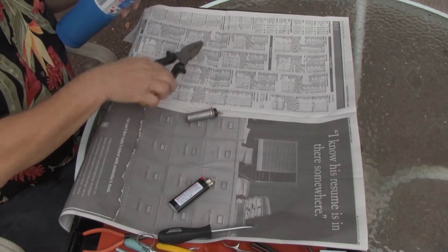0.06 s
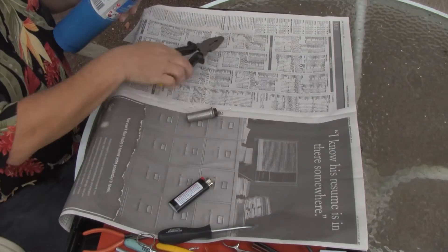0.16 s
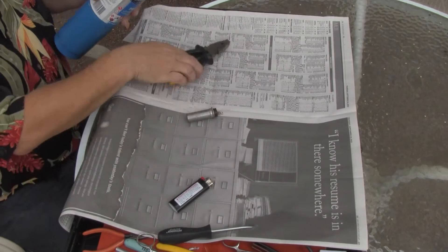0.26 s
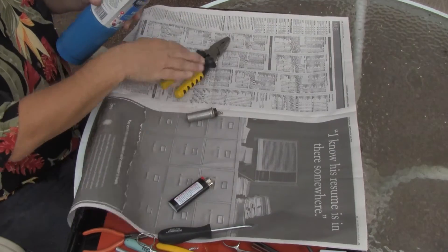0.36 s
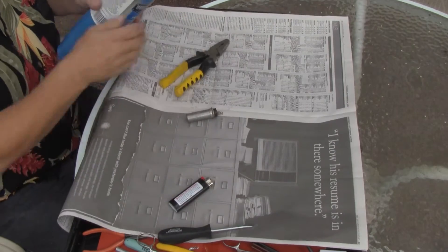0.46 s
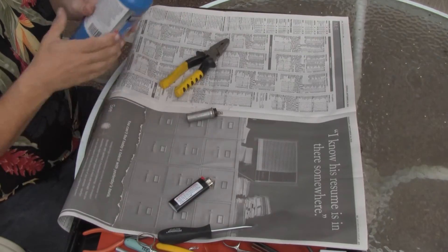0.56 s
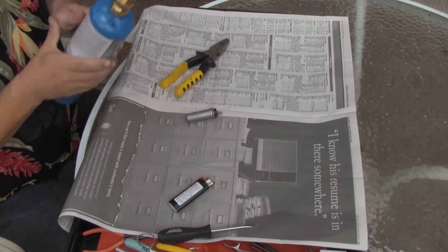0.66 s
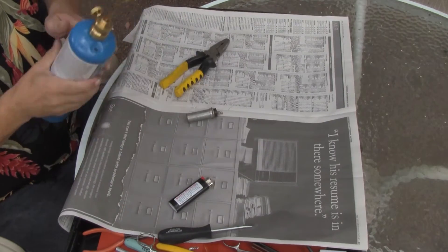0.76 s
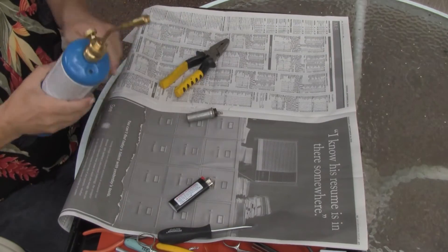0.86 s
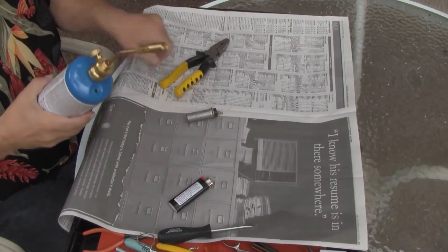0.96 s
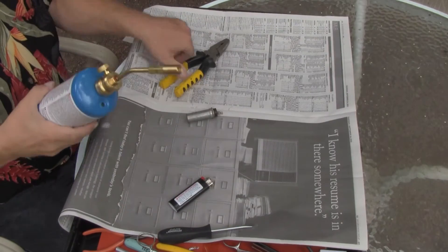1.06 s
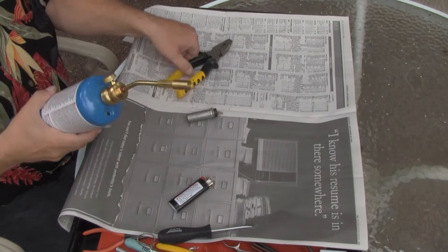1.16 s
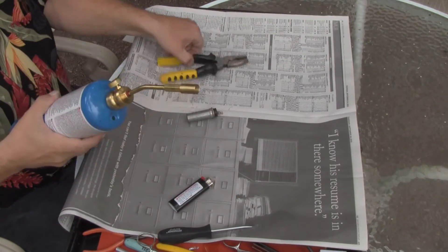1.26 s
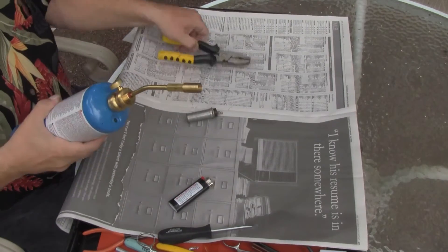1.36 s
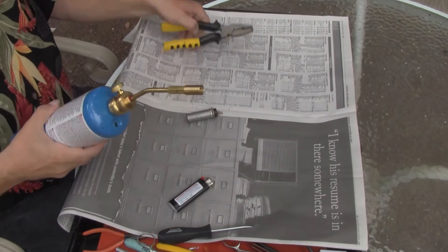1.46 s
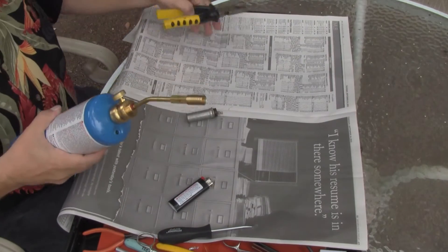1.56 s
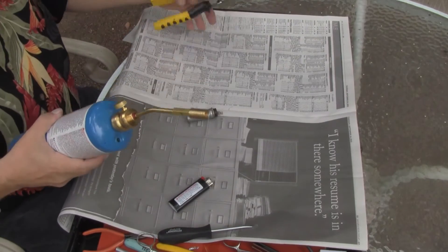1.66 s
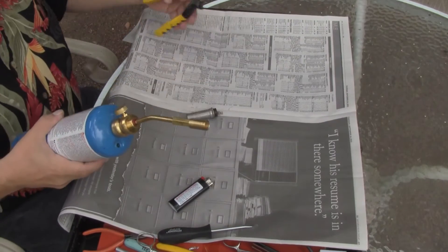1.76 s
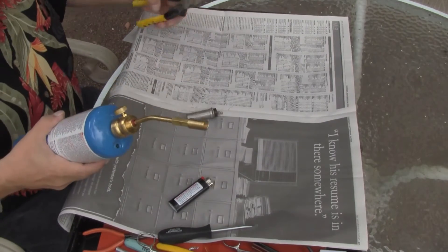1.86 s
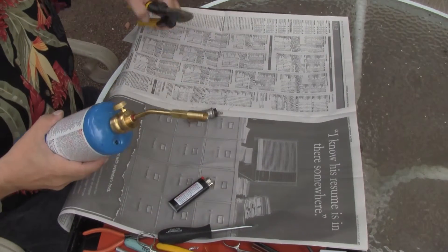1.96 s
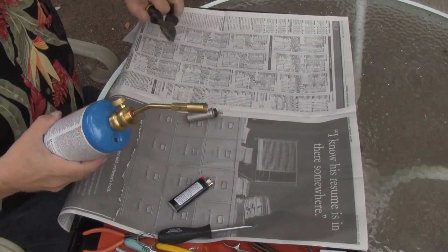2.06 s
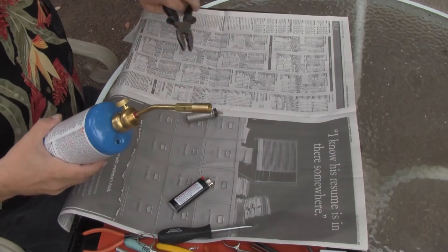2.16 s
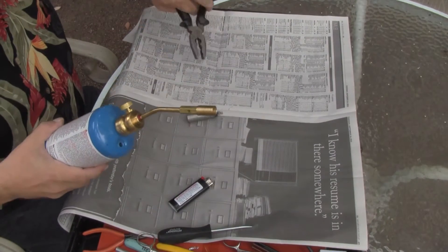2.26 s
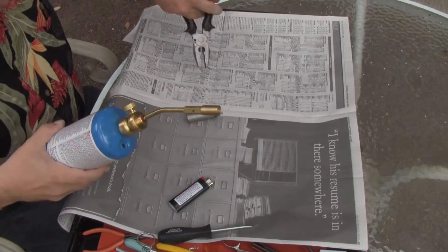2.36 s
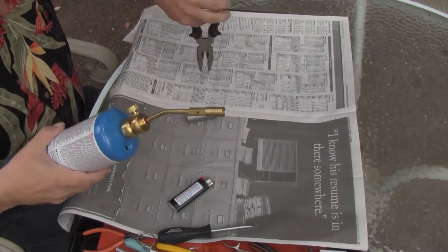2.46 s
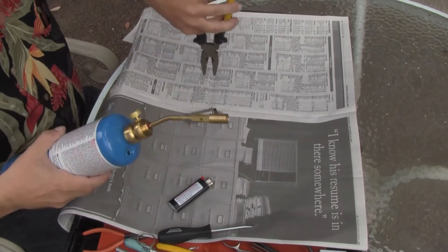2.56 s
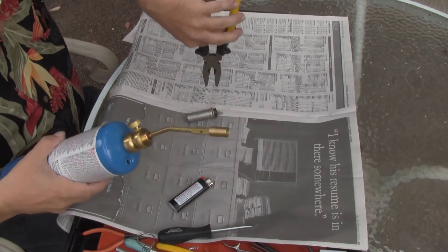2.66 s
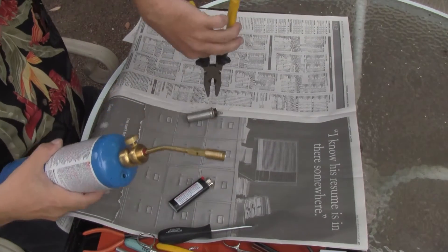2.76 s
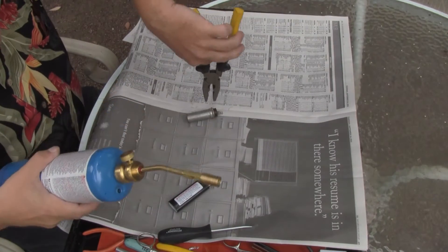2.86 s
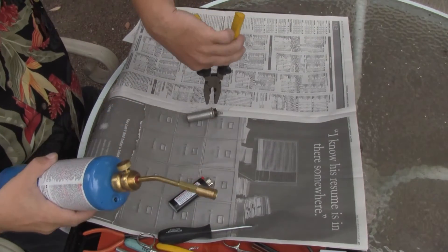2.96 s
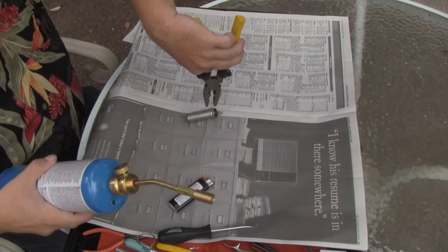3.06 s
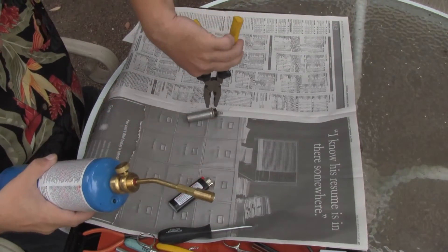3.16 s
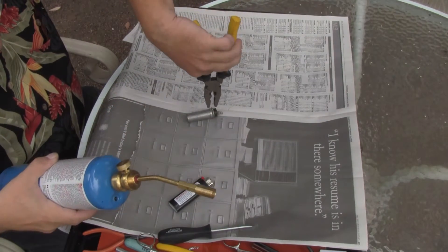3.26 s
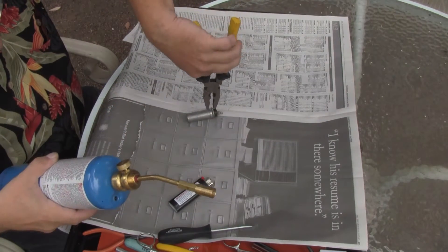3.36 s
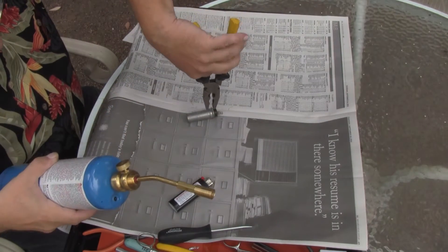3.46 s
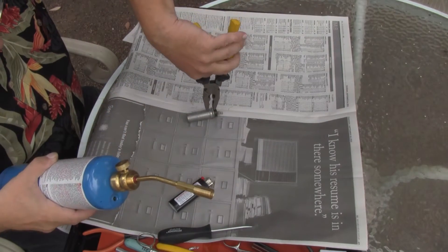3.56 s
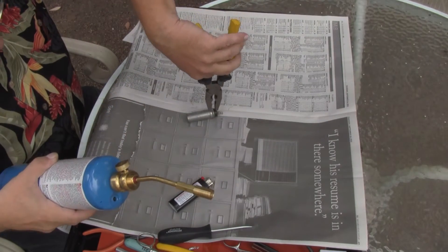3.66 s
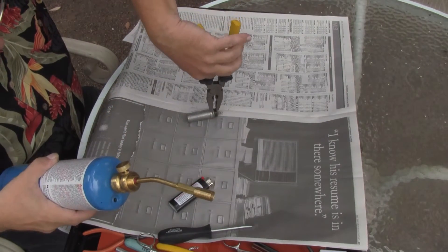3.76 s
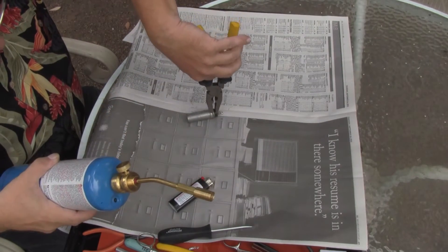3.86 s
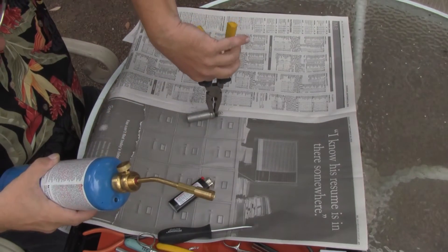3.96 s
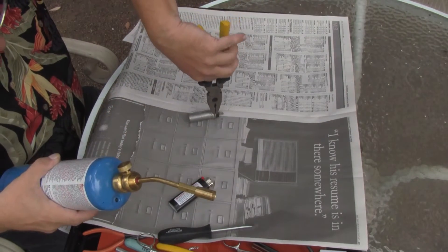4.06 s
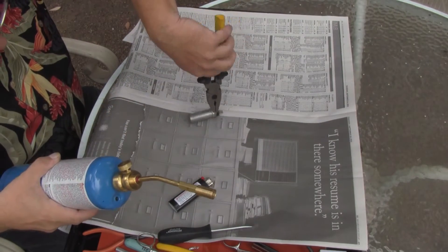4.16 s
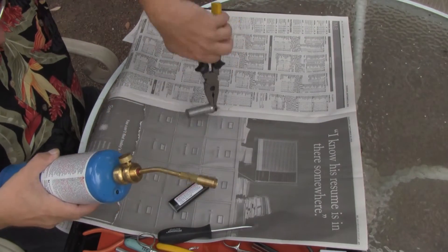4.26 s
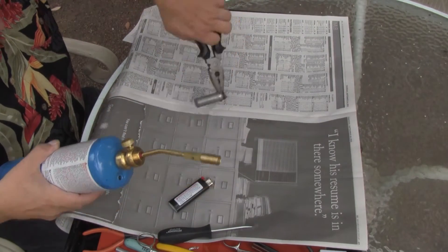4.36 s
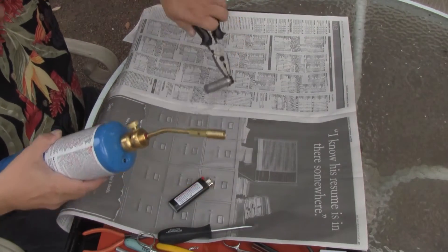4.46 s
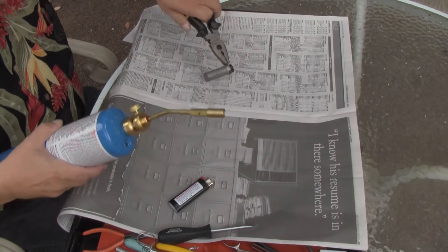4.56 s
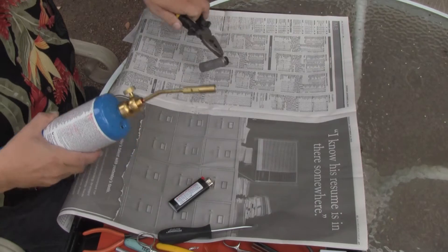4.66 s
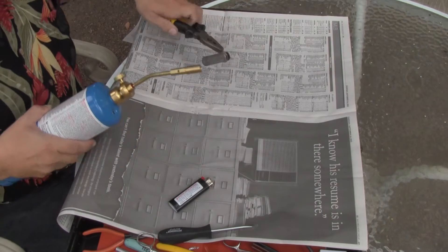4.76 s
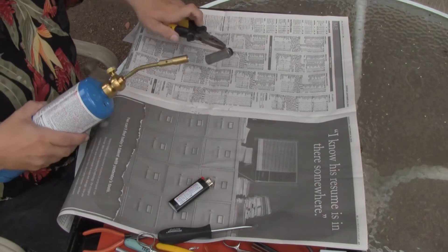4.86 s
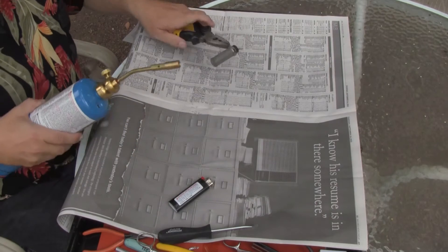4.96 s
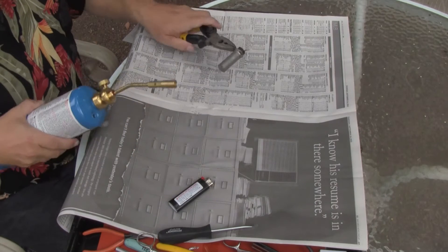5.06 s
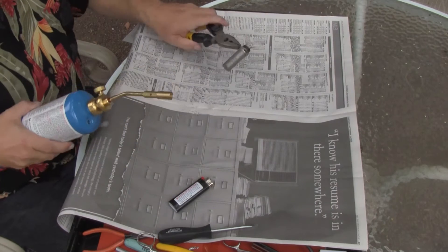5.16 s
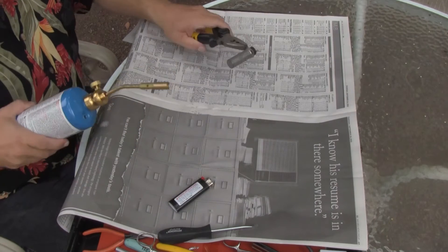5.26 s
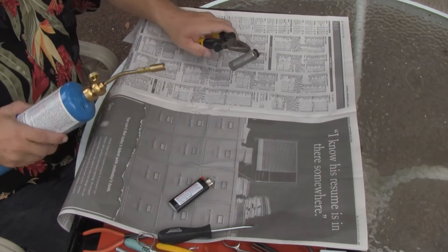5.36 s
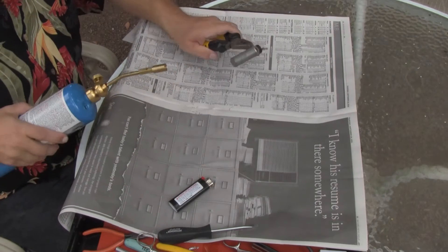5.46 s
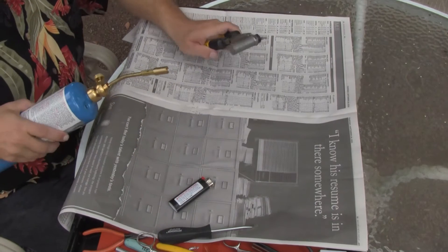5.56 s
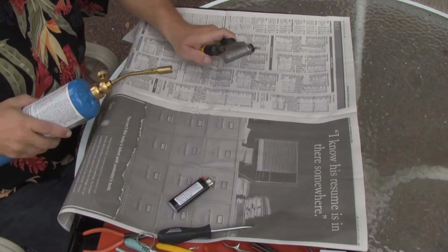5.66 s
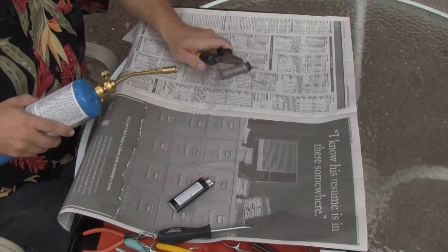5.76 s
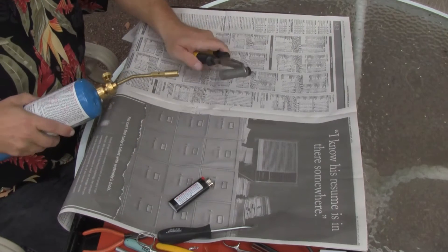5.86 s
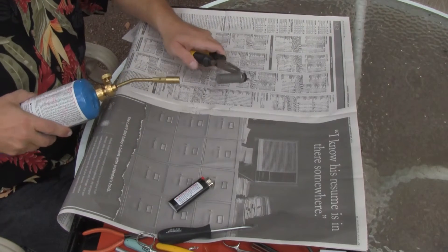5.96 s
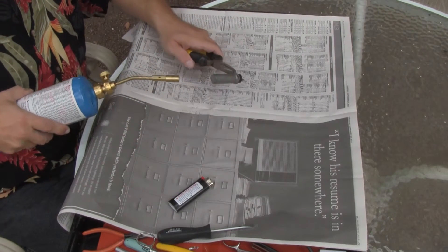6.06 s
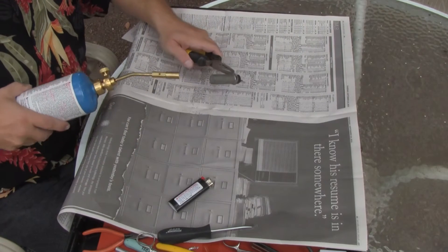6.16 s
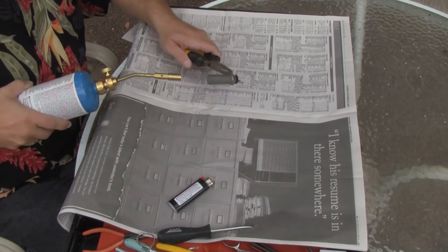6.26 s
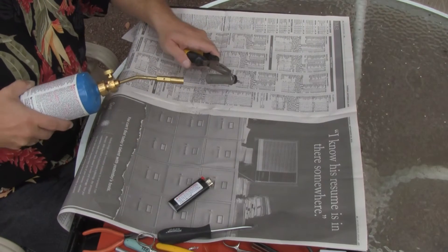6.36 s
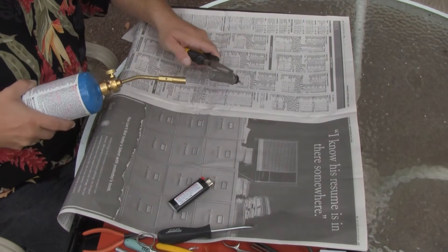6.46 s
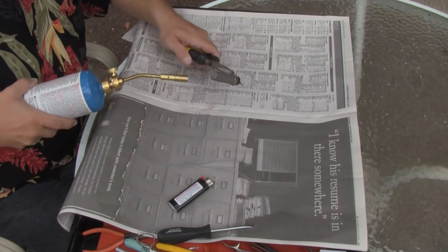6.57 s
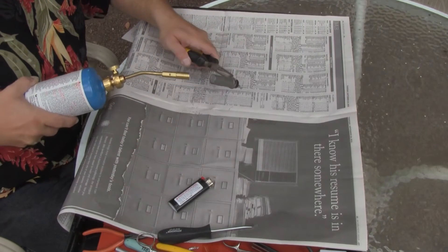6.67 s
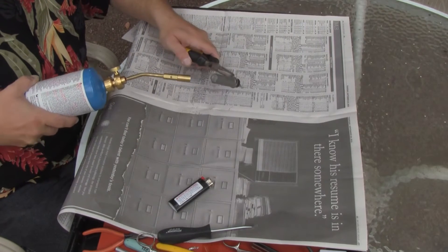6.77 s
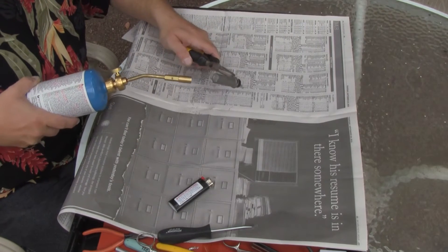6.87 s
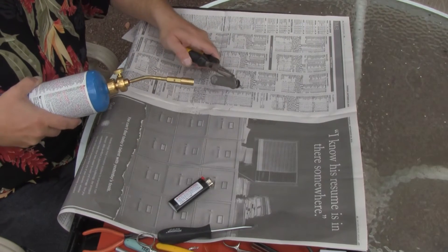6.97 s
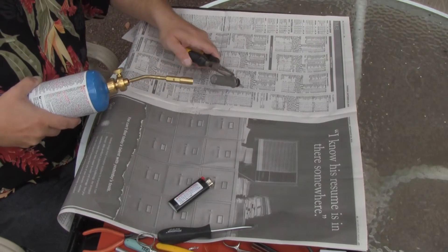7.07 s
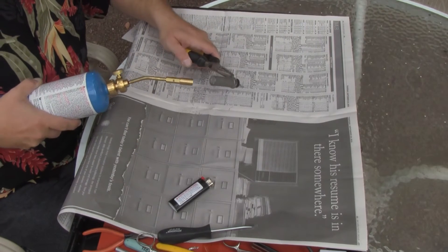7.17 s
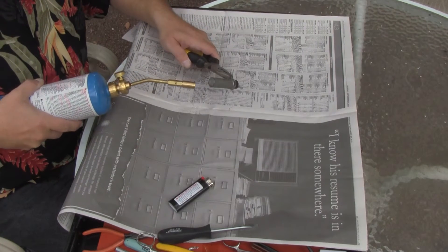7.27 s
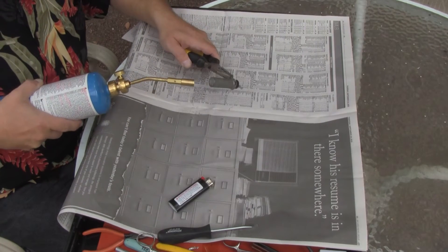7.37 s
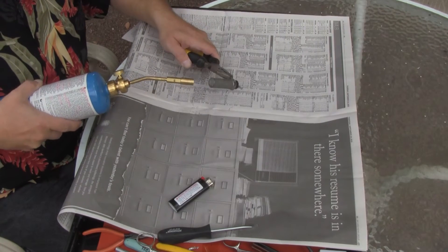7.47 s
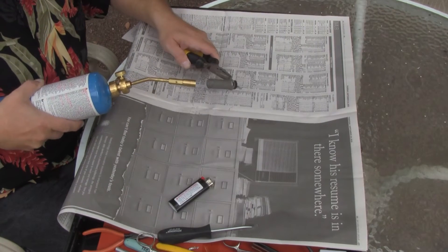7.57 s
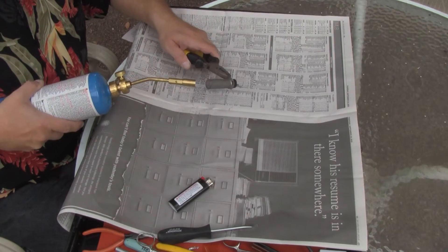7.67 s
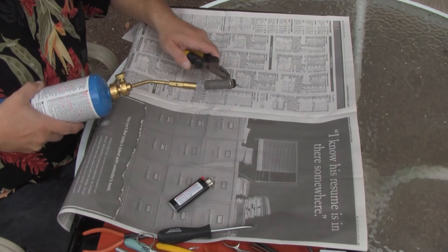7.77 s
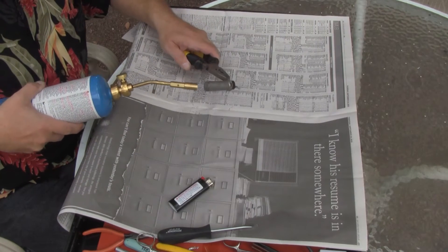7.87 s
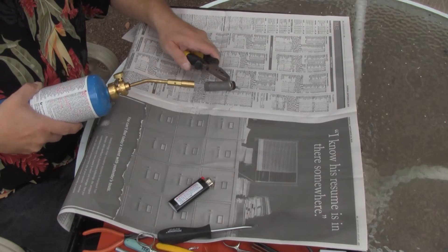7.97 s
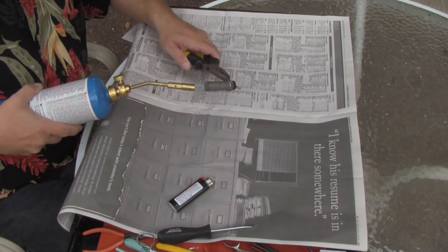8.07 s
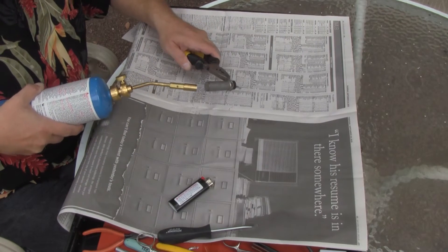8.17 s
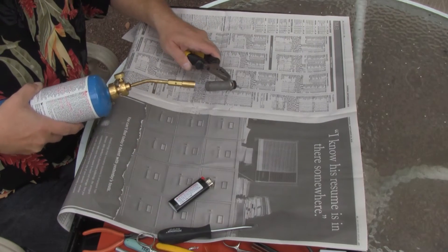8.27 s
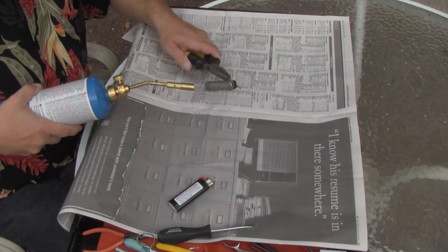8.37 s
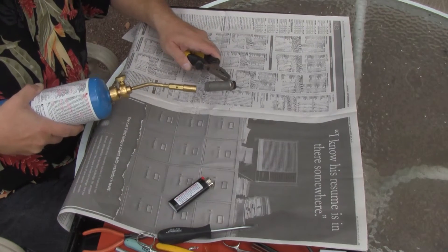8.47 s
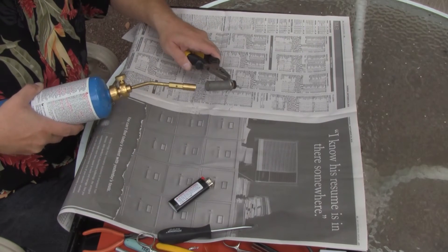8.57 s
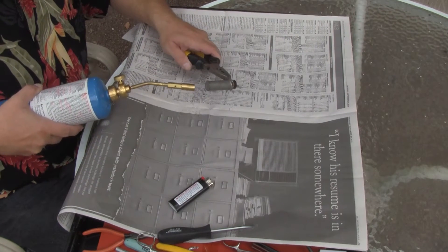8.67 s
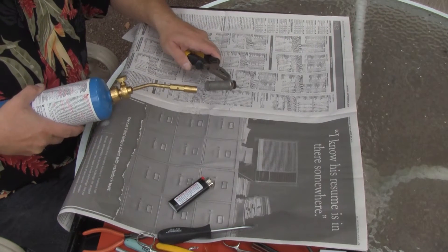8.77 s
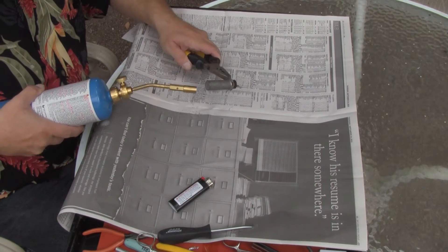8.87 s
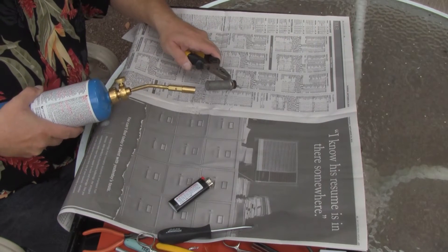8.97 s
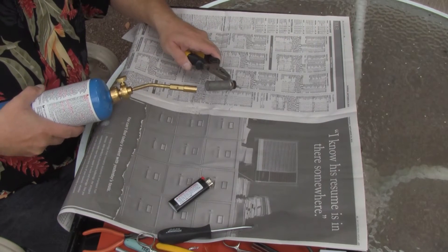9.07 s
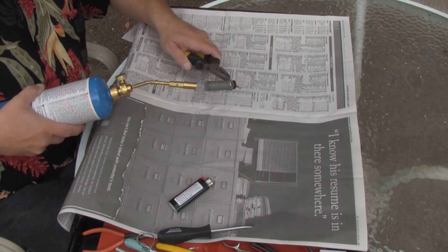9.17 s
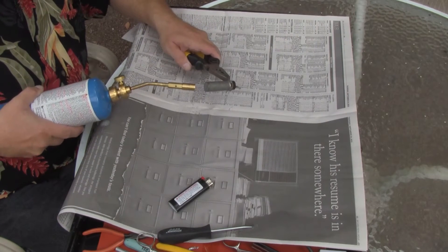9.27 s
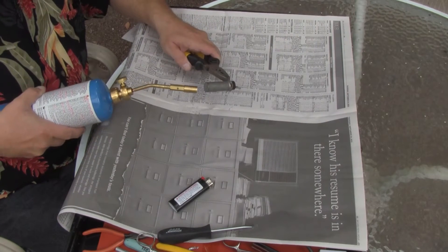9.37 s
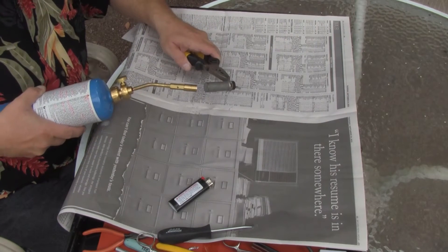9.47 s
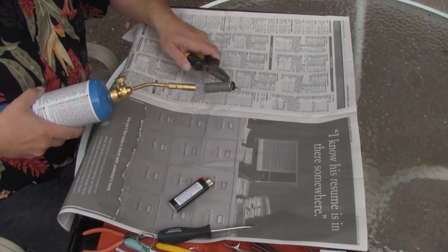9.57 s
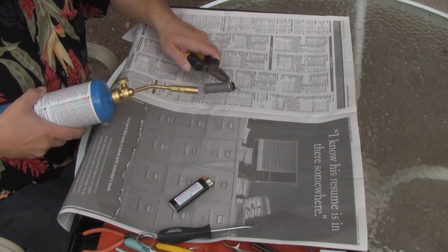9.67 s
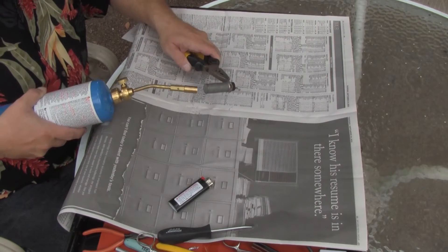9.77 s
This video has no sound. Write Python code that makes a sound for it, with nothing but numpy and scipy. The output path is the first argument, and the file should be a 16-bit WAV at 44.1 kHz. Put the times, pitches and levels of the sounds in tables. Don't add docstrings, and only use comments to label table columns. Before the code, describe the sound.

A gas torch burns continuously close to two small microphones, a rough midrange roar with bright hiss and a thin airy whistle. Pliers drop on a glass table almost at once, rattling briefly, then are lifted with a soft knock. The torch's colour sweeps as the hand moves. Midway it comes lower, a small metal click follows, and near the end the flame flares in short puffs against metal.

```python
import sys
import numpy as np
from scipy import signal
from scipy.fft import rfft, irfft, next_fast_len
from scipy.io import wavfile
from scipy.ndimage import uniform_filter1d, map_coordinates

SR = 44100
rng = np.random.default_rng(int(sys.argv[2]) if len(sys.argv) > 2 else 0)


def elevation(decibels):
    levels = np.asarray(decibels, float)
    return 10 ** (levels / 20)


def waveform_to_disk(signal):
    frames = np.transpose(np.atleast_2d(signal))
    scaled = np.clip(frames, -1, 1) * 32767
    samples = np.round(scaled).astype(np.int16)
    wavfile.write(sys.argv[1], SR, samples)


N = 432621

# (time [s], table [ms], forearm [ms], body [ms], gas tank [ms])
HAND_PATH = [(0, 1.049, 1.405, 2.877, .584), (.49, 1.277, 1.646, 2.854, .578),
             (.77, 1.475, 1.836, 2.884, .554), (.93, 1.472, 1.91, 2.89, .54),
             (1.25, 1.345, 1.947, 2.87, .485), (1.81, 1.365, 1.94, 2.983, .467),
             (2.12, 1.458, 1.98, 3.064, .477), (2.65, 1.286, 1.864, 2.829, .491),
             (2.96, 1.225, 1.795, 2.7, .597), (4.18, 1.161, 1.71, 2.573, .595),
             (4.52, 1.222, 1.737, 2.518, .5), (4.83, .89, 1.755, 2.365, .39), (5.15, .74, 1.8, 2.253, .453),
             (5.64, .7, 1.668, 2.17, .545), (5.93, .468, 1.58, 2.31, .68), (6.76, .455, 1.557, 2.269, .655),
             (7.17, .4, 1.53, 2.222, .624), (9.81, .39, 1.5, 2.26, .608)]


def curve(table, hz):
    at, value = np.transpose(table)
    return np.interp(np.log(hz + 1), np.log(at), value)


def shaped(x, gain_at):
    size = next_fast_len(N)
    return irfft(rfft(x, size) * gain_at(np.fft.rfftfreq(size, 1 / SR)), size)[:N]


def coloured(x, table):
    y = shaped(x, lambda hz: elevation(curve(table, hz)))
    return y / np.std(y)


def walk(rate):
    k = max(int(SR / rate), 2)
    levels = np.repeat(rng.standard_normal(N // 20), k)[:N]
    y = uniform_filter1d(uniform_filter1d(levels, k), k)
    return y / np.std(y)


def columns(table):
    s, *values = np.transpose(table)
    return [np.interp(np.arange(N) / SR, s, v) for v in values]


def late(x, lag_ms):
    return map_coordinates(x, [np.arange(N) - lag_ms * SR / 1000], order=3)


def held(high_low):
    high_ms, low_ms = 1.2, 0.45
    table_ms = columns(HAND_PATH)[0]
    low = np.clip((high_ms - table_ms) / (high_ms - low_ms), 0, 1)
    return high_low[0] + (high_low[1] - high_low[0]) * low


def roar(flutter, bursts):
    # (frequency [Hz], level [dB])
    flame_tone = [(120, -23.5), (300, 0.5), (500, 1), (700, -0.5), (850, 0.5), (1000, 3), (1250, 0),
                  (1600, -3.5), (2100, -3.5), (2600, -6.5), (3200, -9.5), (3700, -16.5), (4500, -25),
                  (8000, -42)]
    # (frequency [Hz], level [dB])
    rumble_tone = [(25, -9), (60, -19.5), (120, -5.5), (200, 4), (300, -2), (500, 4.5), (900, -31)]
    rumble_db = held((-14, -13.5))
    eddies = rng.standard_normal(N) * elevation(0.15 * flutter + 0.68 * bursts)
    rumble = coloured(rng.standard_normal(N), rumble_tone)
    return coloured(eddies, flame_tone) + elevation(rumble_db) * rumble


def burning_hiss(flutter, bursts):
    # (frequency [Hz], level [dB])
    hiss_tone = [(2500, -35), (3900, -4), (4400, 1.5), (5000, -3.5), (5500, 1), (6000, 2), (6600, -4),
                 (7500, -4.5), (8500, -5), (10000, -23)]
    swing_db = 1.1 * flutter + 0.43 * bursts + 0.93 * walk(400)
    return coloured(rng.standard_normal(N) * elevation(swing_db), hiss_tone)


def jet_air(bursts):
    # (frequency [Hz], level [dB])
    air_tone = [(6000, -12), (7500, 6.5), (8200, 4), (9000, 3), (12000, -0.5), (14000, -11), (15800, -6)]
    swing_db = 0.32 * walk(9) + 0.63 * bursts + 2.2 * walk(300)
    return coloured(rng.standard_normal(N) * elevation(swing_db), air_tone)


def jet_whistle(echo_change_db):
    # (frequency [Hz], width [Hz], level [dB])
    whistle_peaks = [(11000, 460, 0), (11700, 900, -6), (12600, 1300, -8), (10100, 1000, -9)]

    def whistled(x, peaks):
        def gain(hz):
            power = sum(elevation(2 * db) / (1 + (2 * (hz - at) / width) ** 2) for at, width, db in peaks)
            return np.sqrt(power)
        return shaped(x, gain)

    shear = rng.standard_normal((2, N)) * elevation(0.8 * walk(6) + 0.59 * walk(200))
    core = whistled(shear[0], whistle_peaks[:1])
    skirt = whistled(shear[1], whistle_peaks[1:])
    whistle = core + elevation(-2 - 0.33 * echo_change_db) * skirt
    return whistle / np.std(whistle)


def nozzle_jet(bursts, hiss_db, whistle_db, shake_ms):
    # (time [s], delay [ms], level [dB])
    jet_bounce = [(0, 1.04, -7), (.8, 1.47, -14), (1.25, 1.31, -17), (2.1, 1.44, -15), (2.53, 1.33, -13),
                  (3.07, 1.172, -20), (3.9, 1.14, -25), (4.5, 1.207, -15), (4.85, .9, -15),
                  (5.15, .734, -9), (5.32, .713, -10), (5.55, .64, -12), (5.72, .615, -13),
                  (5.95, .452, -8), (6.2, .48, -8), (6.45, .436, -10), (7.2, .395, -16), (9.81, .333, -18)]
    lag_ms, echo_db = columns(jet_bounce)
    echo_change_db = echo_db - np.mean(echo_db)
    jet = elevation(hiss_db - 4.0) * jet_air(bursts) + elevation(whistle_db + 1.0) * jet_whistle(echo_change_db)
    tank_db = held((-13, -11)) + np.minimum(echo_change_db, 0)
    tank = elevation(tank_db) * late(jet, columns(HAND_PATH)[3] - shake_ms)
    echo = elevation(echo_db + 2.2)
    table = echo * late(jet, lag_ms + shake_ms)
    return (jet + table + tank) / np.sqrt(1 + echo ** 2)


def echoed(x, shake_ms):
    table_ms, arm_ms, body_ms, tank_ms = np.array(columns(HAND_PATH)) + shake_ms
    table_low, table_high = elevation(held((-5.5, -3.2))), elevation(held((-27, -25)))
    arm, body, tank = elevation(held((-22, -9.5))), elevation(held((-17, -19))), elevation(held((-14, -12)))
    rim_ms, rim = 2.24, elevation(held((-16, -34)))
    lows = shaped(x, lambda hz: 1 / (1 + (hz / 4800) ** 3))
    highs = x - lows
    rim_lows = shaped(lows, lambda hz: 1 - 1 / (1 + (hz / 900) ** 2))
    y = x + late((0.22 + 0.72 * table_low) * lows + 1.8 * table_high * highs, table_ms)
    y = y + rim * late(rim_lows, rim_ms + shake_ms)
    y = y + elevation(-0.1) * arm * late(lows, arm_ms)
    y = y + body * late(lows, body_ms)
    return y + tank * late(highs, tank_ms)


def torch():
    # (time [s], flame level [dB], aim of the nozzle, 0 = at the microphones [dB])
    burn = [(0, -29, -6.5), (.6, -28.5, -9), (1.0, -26, -12.5), (1.3, -24.5, -4), (2.3, -24.5, -4),
            (2.85, -24.5, -2.5), (3.5, -24.5, -0.5), (4.3, -24, -2.5), (4.68, -27, -12), (5.1, -27, -1.5),
            (5.65, -28, -8.5), (5.93, -27.5, -2.5), (6.45, -27, -4), (6.85, -26.5, -11), (7.5, -26.5, -6.5),
            (7.9, -25, -5), (8.9, -25, -7), (9.81, -25, -4.5)]
    # (time [s], gain [dB])
    flares = [
        (1.59, -1),
        (7.84, 2),
        (8.16, 1),
        (8.93, 0.5),
        (9.23, 0),
        (9.38, 3.5),
        (9.69, 2.5),
        (9.81, 2),
    ]
    flare_s = 0.047
    t = np.arange(N) / SR
    flame_db, aim_db = columns(burn)
    flame_db = flame_db + sum(db * np.exp(-((t - s) / flare_s) ** 2) for s, db in flares)
    whistle_db = -33 + aim_db - flame_db
    hiss_db = -39.5 + 0.2 * aim_db + 0.37 * (flame_db - np.mean(flame_db)) - flame_db
    shake_ms = 0.012 * walk(5)
    flutter, bursts = walk(14), walk(160)
    flame = roar(flutter, bursts) + elevation(hiss_db - 0.44) * burning_hiss(flutter, bursts)
    jet = nozzle_jet(bursts, hiss_db, whistle_db, shake_ms)
    return elevation(flame_db) * (elevation(-1.0) * echoed(flame, shake_ms) + jet)


def ring(x, modes):
    out = 0
    for hz, db, t60 in modes:
        pole = np.exp(2j * np.pi * hz / SR - np.log(1000) / (t60 * SR))
        out = out + elevation(db) * signal.lfilter([1], [1, -pole], x).imag
    return out


def pliers():
    # (time [s], rap on the glass [dB], thud of the whole top [dB], metal tick [dB])
    blows = [(0.3346, 1.2, -10.5, -21), (.345, -30, -8.5, -8), (0.364, -22, -24, -11), (.382, -7, -23, -25),
             (0.3885, -1.5, -10, -14), (.399, -10, -22, -16), (0.4063, -2.5, -13, -18),
             (0.434, -9, -10, -30), (1.336, -15, -9, -17), (5.6236, -16, -41.5, -14.5),
             (2.914, -24, -30, -29)]
    # (time [s], level [dB])
    rattle = [(0.334, -63), (0.334, -21), (.36, -16.5), (.378, -18), (.39, -15), (.41, -18), (.44, -25),
              (.47, -38), (.52, -54)]
    # (frequency [Hz], level [dB])
    scrape_tone = [(200, 0), (500, 7), (1000, 12), (2000, 6), (3500, -1.5), (6000, -20.5), (8000, -9.5),
                   (12000, -14), (16000, -34)]
    # (frequency [Hz], level [dB], time to fall 60 dB [s])
    glass_modes = [(416, -8, 0.11), (556, -27, .12), (760, -7, 0.11), (870, -4.5, 0.12), (980, -6, 0.1),
                   (1056, -3, 0.099), (1290, -4, 0.085), (1450, -7, 0.058), (1610, -19, .08),
                   (1970, -10, 0.057)]
    # (frequency [Hz], level [dB], time to fall 60 dB [s])
    top_modes = [(105, -14, .4), (133, -6, .6), (183, 0, .55), (215, -1, .05), (291, -4, .22),
                 (395, -5, .2)]
    # (frequency [Hz], level [dB], time to fall 60 dB [s])
    steel_modes = [(2400, -1, .012), (2900, -4, .025), (3600, -6, .01), (4300, -6, .012), (5500, -3, .01),
                   (6500, -7, .01), (7700, -12, .03), (9300, -7, .008), (11500, -14, .008)]
    rap, thud, tick = np.zeros((3, N))
    for s, rap_db, thud_db, tick_db in blows:
        i = int(s * SR)
        rap[i], thud[i], tick[i] = -elevation(rap_db), elevation(thud_db), elevation(tick_db)
    s, db = np.transpose(rattle)
    chatter = coloured(rng.standard_normal(N) * elevation(1.3 * walk(500)), scrape_tone)
    chatter = chatter * elevation(np.interp(np.arange(N) / SR, s, db, left=-200, right=-200))
    glass = ring(uniform_filter1d(rap, size=9) + elevation(-59) * chatter, glass_modes)
    top = ring(uniform_filter1d(thud, size=60), top_modes)
    top = shaped(top, lambda hz: (1j * hz / (110 + 1j * hz)) ** 3)
    jaws = elevation(-6) * ring(tick, steel_modes)
    return elevation(-12.0) * glass + elevation(-11.0) * top + jaws + chatter


def scene():
    # (frequency [Hz], level [dB])
    scatter_share = [(30, -22), (200, -25), (1000, -37), (5000, -17.5), (9000, -14.5), (14000, -12)]
    field = torch() + pliers()
    smear = rng.standard_normal(900) * np.exp(-np.arange(900) / 200) / 10
    scatter = shaped(field, lambda hz: elevation(curve(scatter_share, hz)))
    scatter = signal.fftconvolve(scatter, smear)[:N]
    return np.array([field + scatter, field - scatter])


def low_pass(x):
    return signal.sosfilt(signal.butter(12, 16020, fs=SR, output="sos"), x)


def record(dry):
    # (frequency [Hz], left minus right [dB])
    port_level = [(60, 0.0), (110, 0.0), (200, -1.5), (380, -4.5), (700, -4.5), (1290, -3.0), (2380, -2.0),
                  (4400, -1.0), (8120, -2.5), (15000, -2.0)]
    # (frequency [Hz], left ahead of right [radians])
    port_phase = [(0, 0), (260, -0.3), (780, 0.0), (9130, 0.0), (13800, 0.8), (15600, -0.1)]

    def port(sign):
        def gain(hz):
            band = (1j * hz / (60 + 1j * hz)) ** 3 * (hz < 15770)
            lead = np.exp(0.5j * sign * curve(port_phase, hz))
            return band * elevation(sign * curve(port_level, hz) / 2) * lead
        return gain

    left = shaped(dry[0], port(1))
    right = shaped(dry[1], port(-1.02))
    return low_pass(np.array([left, right]))


dry = scene()
out = record(dry)
waveform_to_disk(out)
```